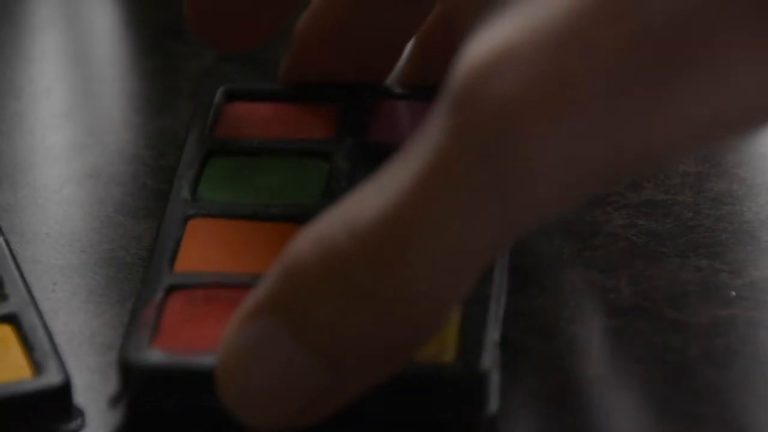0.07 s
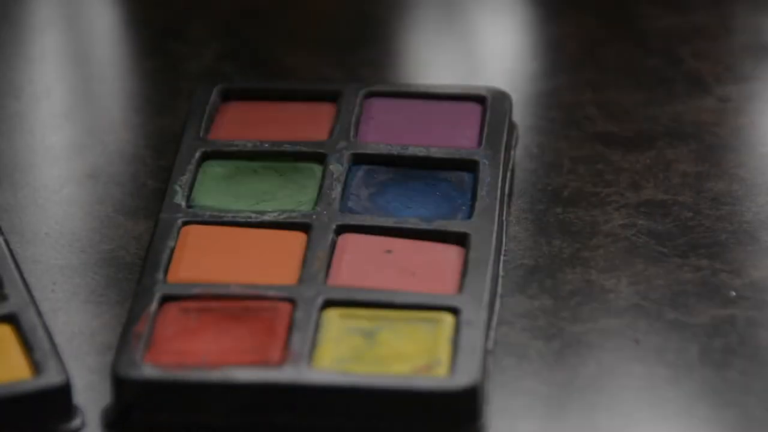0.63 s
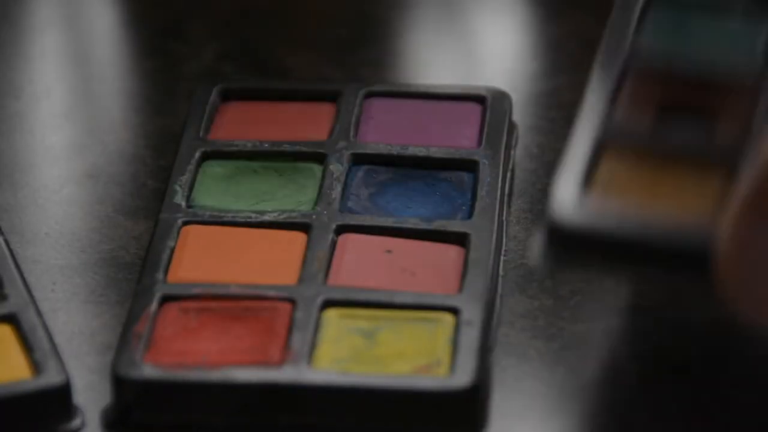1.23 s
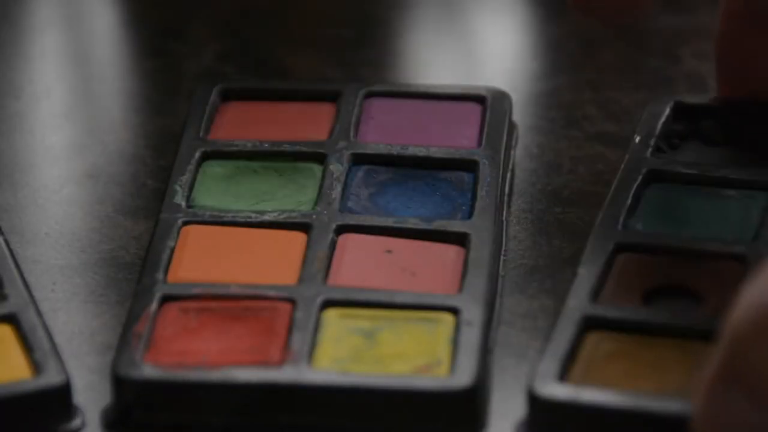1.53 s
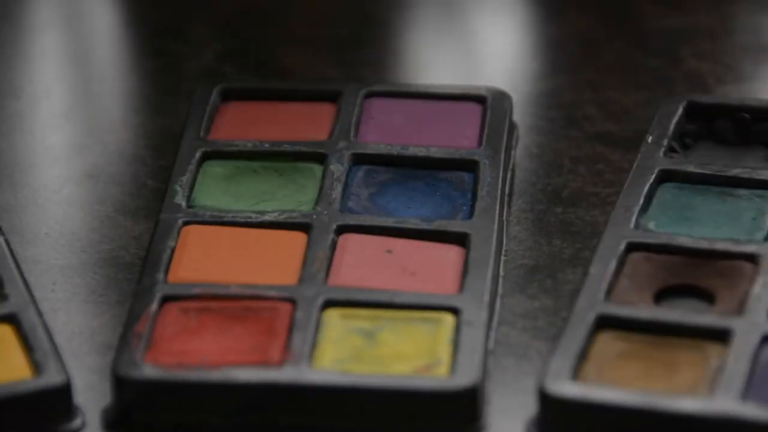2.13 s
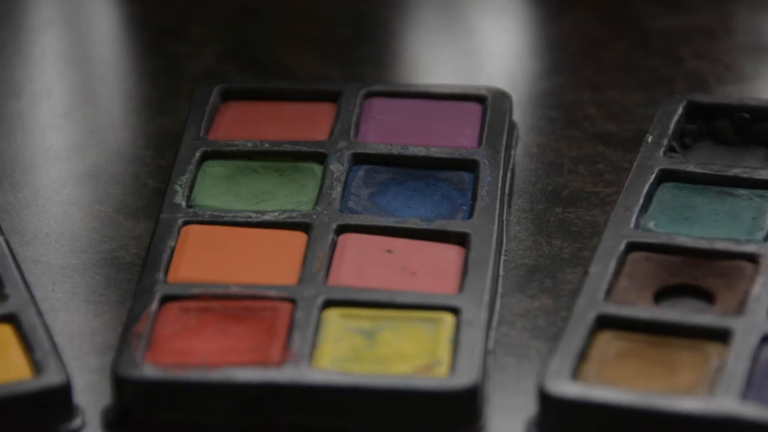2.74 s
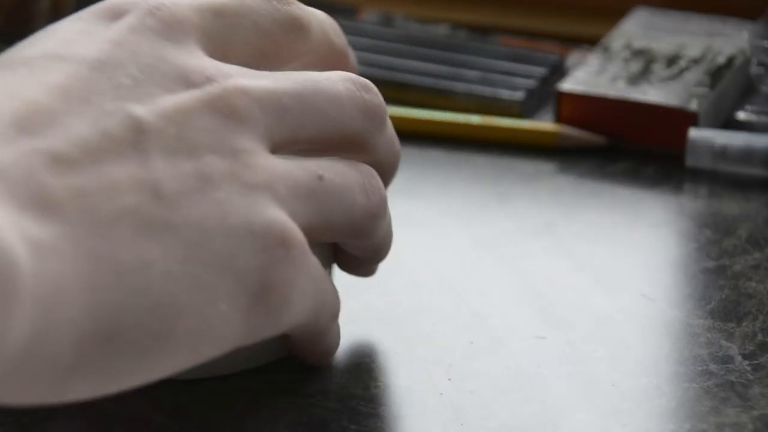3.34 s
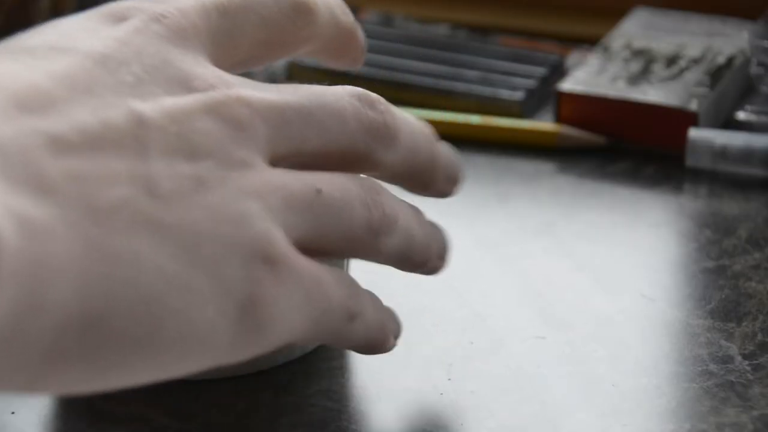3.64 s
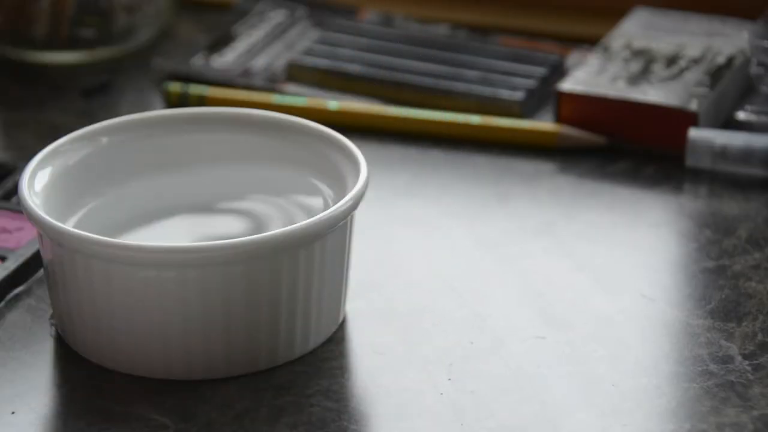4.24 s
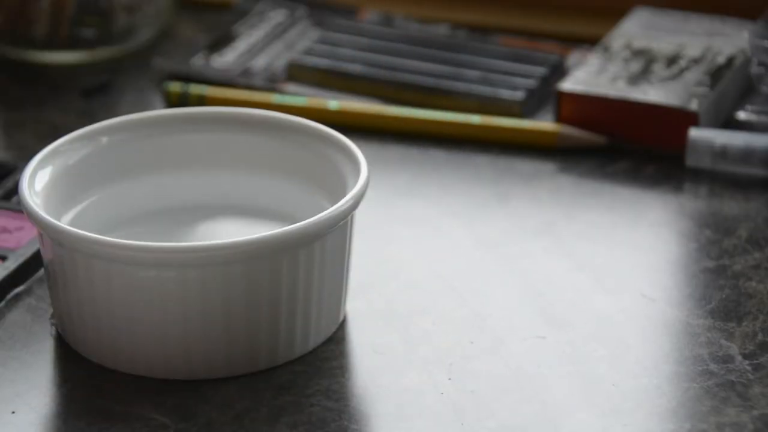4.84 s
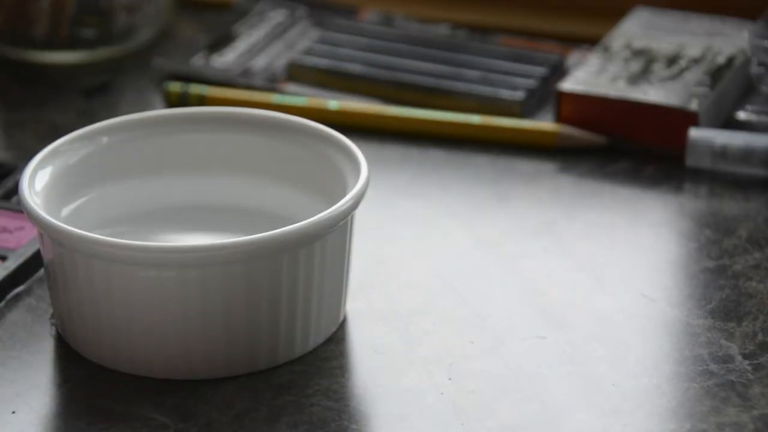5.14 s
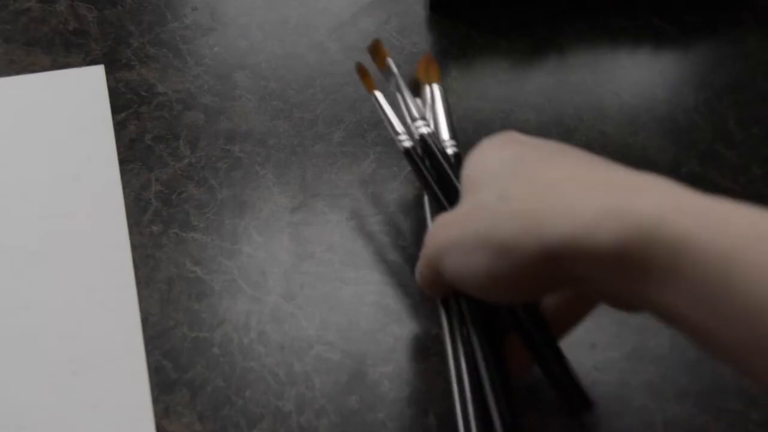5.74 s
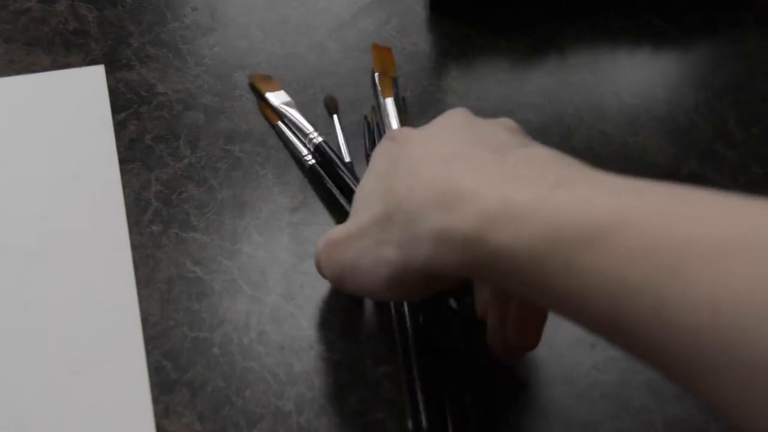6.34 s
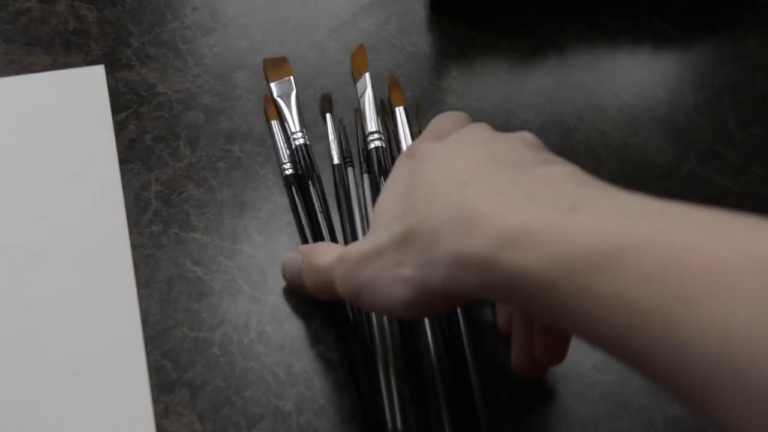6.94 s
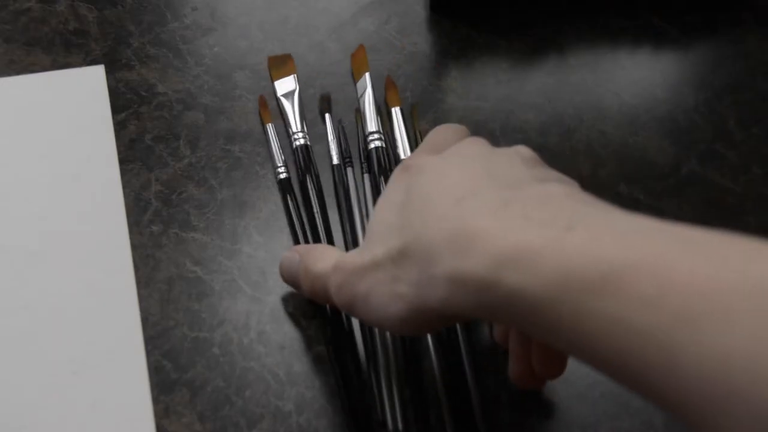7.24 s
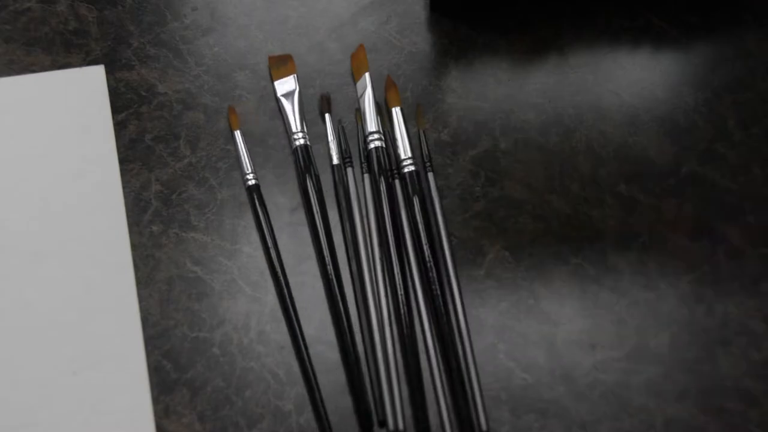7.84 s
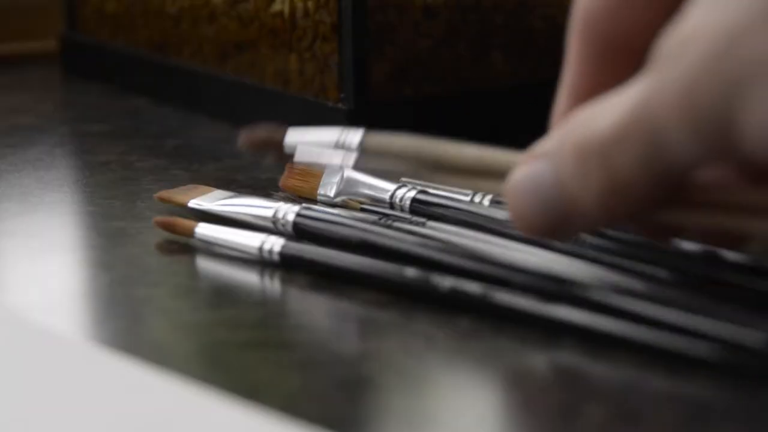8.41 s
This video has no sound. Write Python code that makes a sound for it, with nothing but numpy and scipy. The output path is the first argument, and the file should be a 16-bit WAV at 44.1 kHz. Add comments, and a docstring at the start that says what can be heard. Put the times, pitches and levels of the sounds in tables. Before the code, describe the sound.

Plastic paint trays tick, a ceramic dish knocks down, then paint brushes clatter onto a hard desk over a low pump hum and soft bubbling.

```python
"""A bunch of paint brushes clatters out of a hand onto a hard desk, close to a mono microphone.
Handles and ferrules clash, bounce and roll. Before that, plastic paint trays tick and scuff, and a
ceramic dish of water is set down with a dull knock. Farther back in the small room an electric pump
hums and water bubbles softly, as in a fish tank; a thin whine hangs in the hiss."""
import sys
import numpy as np
from scipy import signal
from scipy.fft import rfft, irfft, next_fast_len
from scipy.io import wavfile

SR = 44100
rng = np.random.default_rng(int(sys.argv[2]) if len(sys.argv) > 2 else 0)


def generate_wav(signal):
    """Clip the signal to [-1, 1] and save it as 16-bit WAV at the path in sys.argv[1]."""
    frames = np.transpose(np.atleast_2d(signal))
    scaled = np.clip(frames, -1, 1) * 32767
    pcm = np.round(scaled).astype(np.int16)
    wavfile.write(sys.argv[1], SR, pcm)


N = 373649
TIME = np.arange(N) / SR
AGE = TIME[:SR // 4]   # time since a contact [s]

# decay of the small room: (frequency [Hz], t60 [s])
ROOM_DECAY = [(200, 0.293), (800, 0.11), (3000, 0.125), (7000, 0.098), (14000, 0.085)]
# colour of the hiss: (frequency [Hz], relative density [dB])
HISS_SPECTRUM = [(300, 7.5), (2000, 2), (3800, -0.5), (5500, 0.5), (8000, -3), (13000, -3.5), (16000, 4)]
# stretches of hiss that start abruptly: (start [s], hiss level [dB], whine level [dB], slope [dB/s])
HISS_STRETCHES = [(0, -66, -58, 0.88), (3.08, -60, -56, -0.16), (5.22, -60.5, -60, -41),
                  (7.922, -62, -55, -28.5)]
# partials of the pump behind the desk: (frequency [Hz], rms level [dB], waver [dB])
PUMP_PARTIALS = [(48.3, -53.5, 2), (100.2, -46, -1.2), (125.9, -58, 2.5), (149.1, -60.5, 2.5),
                 (238.3, -59.5, 1.5), (303, -74, -3.5), (359.3, -54.5, 0.5), (415.4, -67, 1),
                 (480, -68.5, 4)]
# rumble of the pump: (frequency [Hz], relative density [dB])
PUMP_RUMBLE = [(22, -23.5), (40, -13.5), (62, -7), (130, -9), (170, -5.5), (210, -15), (330, -12),
               (450, -17.5), (600, -18), (1100, -22.5), (1600, -33), (3000, -40), (6000, -53)]
# the biggest bubbles: (time [s], relative level [dB], pitch [Hz])
BIG_BUBBLES = [(0.941, -36.5, 744), (1.191, -28, 626), (1.426, -37.5, 686), (1.709, -35, 763),
               (1.882, -37, 705), (3.056, -33.5, 1020), (3.721, -34, 655), (3.983, -36.5, 1076),
               (4.371, -38.5, 770), (4.504, -34.5, 755), (4.653, -33.5, 740), (4.987, -36, 697),
               (5.672, -37, 717)]

# slides across the desk: (start [s], length [s], level [dB], band centre [Hz], "tray" or "dish")
SLIDES = [(0.151, .11, -58.5, 4260, "tray"), (1.045, 0.261, -62, 2320, "tray"),
          (1.532, 0.084, -57, 4000, "tray"), (1.673, 0.093, -59, 3570, "tray"),
          (3.4, 0.1, -41, 600, "dish"), (3.413, 0.12, -60.5, 2690, "dish"),
          (3.565, 0.033, -56, 2380, "dish"), (3.563, .04, -48, 700, "dish"),
          (4.282, 0.04, -49.5, 2080, "dish"), (4.68, .3, -62, 2600, "dish")]
# sharpest ticks of the trays: (time [s], relative level [dB], brightness [dB], leading note [Hz])
TRAY_TICKS = [(0.1809, -41.5, -10, 3630), (1.054, -42, -5, 2050), (1.1051, -33.5, -9, 1880),
              (1.1465, -36.5, -21, 2110), (1.1722, -40, -9, 3700), (1.2505, -40, -20, 2470),
              (1.2958, -40, -15, 3320), (1.3632, -46.5, -22, 2010), (1.511, -40.5, -7, 3330),
              (1.556, -39, -11, 3220), (1.6966, -44.5, -16, 2257), (1.7683, -42.5, -14, 3320),
              (1.788, -39, -12, 4800), (4.2882, -37, -33, 2000), (5.9435, -53, -3, 2500)]
# modes of a plastic tray: (frequency [Hz], relative level [dB], t60 [s])
TRAY_MODES = [(1850, -13, 0.026), (2300, 0.5, 0.02), (2620, -26, 0.028), (3320, -5, 0.029),
              (3640, -6, 0.036), (4390, 11.5, 0.018), (5360, 5.5, 0.035)]
# contact noise of a tray: (frequency [Hz], relative density [dB])
TRAY_CRACK = [(600, -11), (1300, -4), (2000, -0.5), (4000, -2.5), (6500, -3.5), (11000, -5.5), (15500, -12)]
# the dish lands, rocks and settles: (time [s], relative level [dB], leading note [Hz], weight [dB])
DISH_KNOCKS = [(3.3358, -17.5, 1140, 3.5), (3.357, -33, 1350, -2), (3.395, -34.5, 1430, -10),
               (3.3982, -23, 704, -3), (3.578, -41, 564, 7)]
# modes of dish and desk together: (frequency [Hz], relative level [dB], t60 [s])
DISH_MODES = [(181, -29.5, .15), (246.6, 0, 0.17), (347, -18.5, 0.052), (428, 5, 0.06), (458.7, 9.5, .085),
              (611, 7, 0.057), (707, 1, 0.072), (940, -9, 0.15), (1023, -11.5, 0.067), (1180, -7.5, 0.072),
              (1378, -7.5, 0.099), (1540, -6, 0.094), (1685, -4, 0.032), (1872, -17.5, 0.051),
              (2236, -27.5, .1), (2873, -9, .035)]
# contact noise of the dish: (frequency [Hz], relative density [dB])
DISH_CRACK = [(150, -5), (300, 7), (1500, 4.5), (2100, -7.5), (3000, -9.5), (4500, -22)]

# modes of wooden handles and metal ferrules: (frequency [Hz], relative level [dB], t60 [s])
BRUSH_MODES = [(2000, -1.5, 0.062), (2600, -5, 0.15), (3240, -4.5, 0.16), (3650, 0, .06),
               (4680, -6.5, 0.07), (5400, -7, 0.12), (4920, -7, .12), (5580, -7.5, .1), (5770, -7.5, 0.1),
               (7930, 4, 0.1), (7730, -8.5, .08), (9300, -2.5, 0.075), (9990, -8, .07), (11840, -2, 0.063),
               (11270, -1, 0.072), (13100, -3.5, 0.046)]
# contact noise of a brush: (frequency [Hz], relative density [dB])
BRUSH_CRACK = [(900, -31), (1700, -12), (2600, 3), (3300, 3.5), (5000, 3.5), (7000, -3), (9500, -2),
               (11700, -1.5), (13300, -5.5), (15800, -19.5)]
# the desk top answering a brush: (frequency [Hz], relative density [dB])
DESK_SPECTRUM = [(150, -28.5), (260, -11), (340, 1.5), (520, 5.5), (700, 5.5), (1000, 2), (1400, 1.5),
                 (2000, -2), (3200, -41.5)]
# hardest clashes within the bunch:
# (time [s], relative click level [dB], brightness [dB], leading note [Hz], relative desk level [dB])
BRUSH_CLASHES = [(6.0745, -42, -5, 3820, -58), (6.089, -24.5, -6, 3690, -36.5),
                 (6.097, -21.5, -18, 3800, -34.5), (6.1075, -21, -4, 3730, -36.5),
                 (6.1134, -19.5, -5.5, 3600, -34.5), (6.1337, -16.5, -3.5, 4850, -25),
                 (6.1452, -21, -5, 6300, -27.5), (6.1479, -18.5, 12.5, 6100, -37),
                 (6.1723, -19, 13.5, 11350, -36.5), (6.3418, -22, 1, 9400, -43),
                 (6.3522, -20.5, -2, 9000, -33.5), (6.3583, -22.5, -14, 9200, -39),
                 (6.4031, -27.5, -21, 5100, -29), (6.4159, -21.5, -10, 2460, -29),
                 (6.4218, -24.5, 0, 4550, -33), (6.5076, -35, -13, 10810, -36.5),
                 (6.5133, -20.5, -2.5, 11100, -36.5), (6.5797, -39, 6, 5440, -65),
                 (6.8353, -38, -31, 2260, -49), (6.9811, -24.5, 1.5, 9740, -56),
                 (6.9955, -26, 1.5, 2480, -48)]
# single brushes drop free and bounce: (time [s], relative click level [dB], brightness [dB],
# leading note [Hz], relative desk level [dB], first flight [s])
BRUSH_DROPS = [(6.1657, -17.5, 1, 4530, -32.5, .0364), (6.4402, -24, 0, 4800, -42.5, 0.032),
               (6.5943, -26, -6.5, 5100, -46, 0.035), (6.6957, -36, -42, 2120, -30, .0394),
               (7.0273, -16.5, 1.5, 11340, -32.5, 0.029)]
# the bunch rolls apart: (start [s], length [s], relative click level [dB], brightness [dB],
# relative desk level [dB], rub band centre [Hz])
BRUSH_ROLLS = [(6.096, 0.093, -23.5, -0.5, -35, 4600), (6.347, 0.13, -32.5, 0, -41.5, 4680),
               (6.688, .14, -48, -23, -43.5, 950), (6.973, .11, -39.5, -9, -42.5, 3780)]


def from_db(db):
    """Decibels to gain."""
    return 10 ** (np.asarray(db) / 20)


def rms_one(x, count=None):
    """Scale so that the first count samples (or all) have rms 1."""
    return x / np.sqrt(np.mean(x[:count] ** 2) + 1e-20)


def at_hz(points, hz):
    """Read a table on a log-frequency axis."""
    f, value = np.transpose(points)
    return np.interp(np.log(hz + 1e-9), np.log(f), value)


def add(out, s, sound):
    """Mix a sound in at time s."""
    i = max(round(s * SR), 0)
    out[i:i + len(sound)] += sound[:N - i]


def bandpass(x, low_hz, high_hz, order=3):
    """Keep the band between two frequencies."""
    return signal.sosfilt(signal.butter(order, [low_hz, high_hz], "band", fs=SR, output="sos"), x)


def coloured(x, spectrum):
    """Causal (minimum-phase) filter with the given spectrum, so nothing sounds early."""
    n = 2 * next_fast_len(len(x) // 2 + 1)
    gain = from_db(at_hz(spectrum, np.fft.rfftfreq(n, 1 / SR)))
    cepstrum = irfft(np.log(gain))
    cepstrum[1:n // 2] *= 2
    cepstrum[n // 2 + 1:] = 0
    return irfft(rfft(x, n) * np.exp(rfft(cepstrum)))[:len(x)]


def noise(spectrum, envelope):
    """Noise under an envelope, then coloured; rms 1."""
    return rms_one(coloured(rng.standard_normal(len(envelope)) * envelope, spectrum))


def drift(per_s):
    """Slow random wander; rms 1."""
    return rms_one(np.interp(TIME * per_s, np.arange(4000), rng.standard_normal(4000)))


def dip(s, width_s, db):
    """A smooth, brief change of level around time s, in dB."""
    return db * np.exp(-((TIME - s) / width_s) ** 2)


def fade(t60):
    """Free decay, 60 dB in t60 seconds."""
    return from_db(-60 * AGE / t60)


def lift(hz, centre_hz, octaves, db):
    """A bell-shaped boost around one frequency, in dB."""
    return db * np.exp(-(np.log2(hz / centre_hz) / octaves) ** 2)


def ring(modes, extra_db, scatter_db, detune):
    """Struck modes; where a blow lands and how the thing is gripped vary their strength and pitch."""
    hz, db, t60 = np.transpose(modes)
    strength, shift = rng.standard_normal((2, len(hz)))
    gain = from_db(db + extra_db + scatter_db * strength) * (-1) ** np.arange(len(hz))
    detuned_hz = hz * (1 + detune * shift)
    return gain @ (np.sin(2 * np.pi * detuned_hz[:, None] * AGE) * fade(t60[:, None]))


def click(modes, colour, bright_db, hz, crack_db, crack_t60, body_db, note_db, note_t60, lift_db):
    """A contact: a dry crack, the body's modes and a leading note. Soft contacts lose their treble."""
    crack = rms_one(noise(colour, fade(crack_t60)), count=176)
    body = rms_one(ring(modes, 0, scatter_db=4.5, detune=0.035), count=176)
    grid_hz = np.geomspace(200, 16000, num=60)
    bass_db = -1.5 * max(bright_db, 0)   # metal on metal has little bass
    tilt = [(1300, bass_db), (3200, 0), (8500, bright_db + 3)]
    shape_db = at_hz(tilt, grid_hz) + lift(grid_hz, hz, octaves=0.093, db=lift_db)
    blow = from_db(crack_db) * crack + from_db(body_db) * body
    knock = coloured(blow, np.transpose([grid_hz, shape_db]))
    note = np.sin(2 * np.pi * hz * AGE) * fade(note_t60) * (1 - np.exp(-AGE * hz))
    return rms_one(knock, count=176) + from_db(note_db) * note


def chance_contacts(start, length, per_s, modes, count=40, spread_db=5):
    """Uneven contacts during a movement: (time [s], strength [dB], frequency of one mode [Hz])."""
    gap, pick = rng.random((2, count))
    db = spread_db * rng.standard_normal(count)
    after = (np.cumsum(0.4 + 1.2 * gap) - 0.7) / per_s
    hz = np.array(modes)[(pick * len(modes)).astype(int), 0]
    return np.transpose([start + after, db, hz])[(after >= 0) & (after < length)]


def room(x, build_s=0.0075):
    """Dense reflections from near walls; the treble dies first."""
    edges, tail = np.geomspace(120, 16000, num=8), 0
    for low, high in zip(edges, edges[1:]):
        band = bandpass(rng.standard_normal(len(AGE)), low, high, order=2)
        tail = tail + band * fade(at_hz(ROOM_DECAY, np.sqrt(low * high)))
    tail = tail * (1 - np.exp(-AGE / build_s))
    return signal.fftconvolve(x, tail / np.linalg.norm(tail))[:N]


def hiss_and_whine(whine_hz=15651.3, hiss_floor_db=-80.5, whine_floor_db=-84):
    """Behind everything, hiss and a thin electronic whine swell and fade together, each to its floor."""
    stretches = np.array(HISS_STRETCHES)
    start, hiss_db, whine_db, db_per_s = stretches[np.searchsorted(stretches[1:, 0], TIME)].T
    swell_db = db_per_s * (TIME - start)
    hiss_db = np.maximum(hiss_db + swell_db, hiss_floor_db)
    whine_db = np.maximum(whine_db + swell_db + dip(3.49, width_s=0.16, db=-16), whine_floor_db)
    whine = np.sqrt(2) * from_db(whine_db) * np.sin(2 * np.pi * whine_hz * TIME)
    return from_db(hiss_db) * noise(HISS_SPECTRUM, np.ones(N)) + whine


def pump_hum():
    """The electric pump hums at the back; each partial wavers, and the level dips briefly once."""
    hum = np.zeros(N)
    for hz, db, waver_db in PUMP_PARTIALS:
        amplitude = np.sqrt(2) * from_db(db + waver_db * drift(per_s=9))
        hum += amplitude * np.sin(2 * np.pi * (hz * TIME + rng.random()))
    return from_db(dip(5.28, width_s=0.11, db=-4.5)) * hum


def bubble(hz, t60, rise_per_s, attack_s=0.0017):
    """A bubble rings for a moment, rising a little in pitch."""
    envelope = fade(t60) * (1 - np.exp(-AGE / attack_s))
    cycles = hz * (AGE + rise_per_s * AGE ** 2 / 2)
    return (np.sin(2 * np.pi * cycles) * envelope)[:SR // 12]


def small_bubbles(count=1100, lowest_hz=679.7, range_octaves=2.15):
    """A soft stream of small bubbles; the tiny high ones are rarer and fainter."""
    out = np.zeros(N)
    for when, pitch, faintness in rng.random((count, 3)):
        octaves = pitch ** 1.4 * range_octaves
        gain = from_db(-37.5 - 22 * faintness - 4.8 * octaves ** 2)
        add(out, when * TIME[-1], gain * bubble(lowest_hz * 2 ** octaves, t60=0.035, rise_per_s=0.99))
    return out


def large_bubbles(per_s=3.5, low_hz=688, high_hz=1160):
    """Middling bubbles break at uneven intervals, with a few big ones among them."""
    out = np.zeros(N)
    middling = [((k + when) / per_s, -38.5, low_hz * (high_hz / low_hz) ** pitch)
                for k, (when, pitch) in enumerate(rng.random((60, 2)))]
    for s, db, hz in list(BIG_BUBBLES) + middling:
        if s < TIME[-1]:
            add(out, s, from_db(db + 2) * bubble(hz, t60=0.067, rise_per_s=0.58))
    return out


def tank(rumble_db=-49, fade_start_s=5.736, fade_db_per_s=8.5):
    """Beyond the desk, pump and bubbling water hold steady, then fade away."""
    level = from_db(-fade_db_per_s * np.maximum(TIME - fade_start_s, 0))
    hum, water = pump_hum(), small_bubbles() + large_bubbles()
    rumble = from_db(rumble_db) * noise(PUMP_RUMBLE, np.ones(N))
    return level * (hum + water + rumble)


def rub(length, hz, slips_per_s=3500):
    """Friction is a dense run of tiny slips that swells and dies under a push; rms 1."""
    slips = (rng.random(SR) < slips_per_s / SR) * rng.standard_normal(SR)
    run = bandpass(slips[:int(length * SR)], hz / 2.7, min(hz * 1.34, SR / 3))
    return rms_one(run * signal.windows.tukey(len(run), 0.5))


def slides(roll_rub_db=-9):
    """Close but faint, trays and dish rub on the desk, and rolling brush handles on each other."""
    out = np.zeros(N)
    for s, length, db, hz, _ in SLIDES:
        add(out, s, from_db(db) * rub(length, hz))
    for s, length, db, _, _, hz in BRUSH_ROLLS:
        add(out, s, from_db(db + roll_rub_db) * rub(length, hz))
    return out


def trays(catches_per_s=25, catch_bright_db=-4):
    """Light plastic ticks sharply as it is put down, and lightly wherever it catches while sliding."""
    out, ticks = np.zeros(N), list(TRAY_TICKS)
    for start, length, _, _, thing in SLIDES:
        if thing == "tray":
            catches = chance_contacts(start, length, catches_per_s, TRAY_MODES)
            ticks += [(s, db - 49.5, catch_bright_db, hz) for s, db, hz in catches]
    for s, db, bright_db, hz in ticks:
        tick = click(TRAY_MODES, TRAY_CRACK, bright_db, hz, crack_db=-9.5, crack_t60=0.019,
                     body_db=-16, note_db=-0.5, note_t60=0.021, lift_db=10.5)
        add(out, s, from_db(db - 4) * tick)
    return out


def dish(desk_below_hz=500):
    """Damped by fingers and water, the dish knocks dully; its weight wakes the desk's low modes."""
    out, mode_hz = np.zeros(N), np.array(DISH_MODES)[:, 0]
    for s, db, hz, weight_db in DISH_KNOCKS:
        favour_db = lift(mode_hz, hz, octaves=0.4, db=5)   # the point of contact favours one region
        desk_db = weight_db * (mode_hz < desk_below_hz)
        body = rms_one(ring(DISH_MODES, favour_db + desk_db, scatter_db=1, detune=0.0078), count=400)
        crack = rms_one(noise(DISH_CRACK, fade(0.03)), count=400)
        note = np.sin(2 * np.pi * hz * AGE) * fade(0.025)
        knock = from_db(-1.5) * body + from_db(-12) * crack + from_db(9) * note
        add(out, s, from_db(db) * knock)
    return bandpass(out, low_hz=180.8, high_hz=3200)   # a dull knock without deep bass or high treble


def brush_bounces(count=4, flight_ratio=0.63, loss_db=9.5):
    """Each bounce of a dropped brush is shorter and weaker than the last; rows as in BRUSH_CLASHES."""
    for s, db, bright_db, hz, desk_db, flight in BRUSH_DROPS:
        for k in range(count):
            yield s, db - k * loss_db, bright_db, hz, desk_db - k * loss_db
            s += flight * flight_ratio ** k


def brush_rattles(per_s=100, edge_db=-6.5):
    """Rolling brushes rattle, more weakly at either end of a roll; rows as in BRUSH_CLASHES."""
    for start, length, db, bright_db, desk_db, _ in BRUSH_ROLLS:
        for s, chance_db, hz in chance_contacts(start, length, per_s, BRUSH_MODES):
            force_db = chance_db + edge_db * (2 * (s - start) / length - 1) ** 2
            yield s, db + force_db, bright_db, hz, desk_db + force_db


def brushes():
    """Right at the microphone, handles clash and rebound at once; the desk answers lower and longer."""
    out = np.zeros(N)
    for s, db, bright_db, hz, desk_db in [*BRUSH_CLASHES, *brush_bounces(), *brush_rattles()]:
        hit = click(BRUSH_MODES, BRUSH_CRACK, bright_db, hz, crack_db=-1.5, crack_t60=0.015,
                    body_db=-13.5, note_db=-4, note_t60=0.04, lift_db=10)
        rebound_s = rng.uniform(0.002, 0.005)
        desk = rms_one(noise(DESK_SPECTRUM, fade(0.13)), count=400)
        add(out, s, from_db(db - 4) * hit)
        add(out, s + rebound_s, from_db(db - 12.5) * hit)
        add(out, s, from_db(desk_db - 7.5) * desk)
    return out


def scene():
    """The desk is close, so direct sound outweighs the room; both channels carry the one microphone."""
    background = tank() + hiss_and_whine()
    knocks, handling, clatter = dish(), slides() + trays(), brushes()
    reflections = room(from_db(-10.5) * clatter + from_db(-9.5) * handling + from_db(-13.5) * knocks)
    mono = clatter + handling + knocks + reflections + background
    return np.array([mono, mono])


def record(dry):
    """Each channel adds a trace of its own hiss; the top is cut steeply."""
    hiss_db, cutoff_hz = -89, 16300
    noisy = dry + from_db(hiss_db) * rng.standard_normal(dry.shape)
    return signal.sosfilt(signal.ellip(10, 0.1, 80, cutoff_hz, fs=SR, output="sos"), noisy)


dry = scene()
out = record(dry)
generate_wav(out)
```